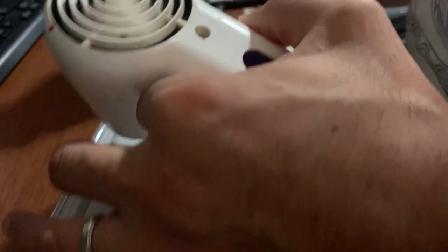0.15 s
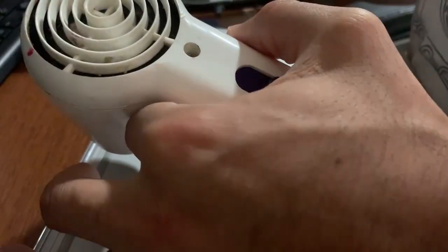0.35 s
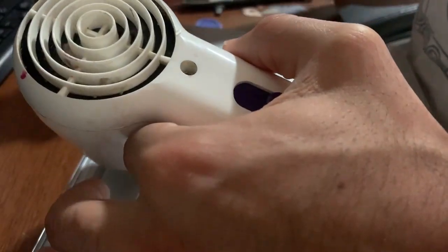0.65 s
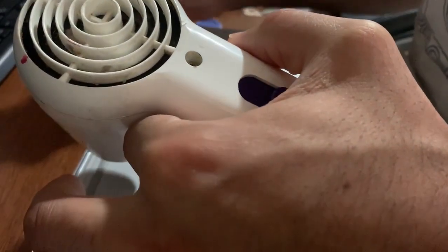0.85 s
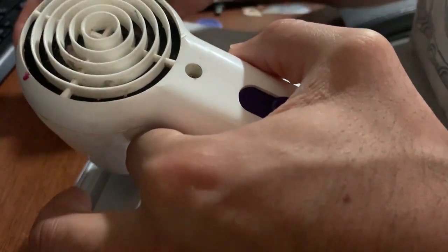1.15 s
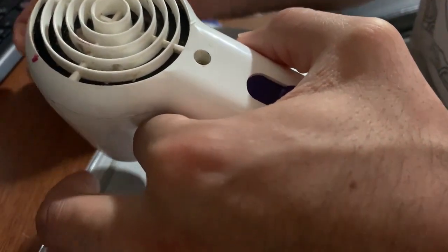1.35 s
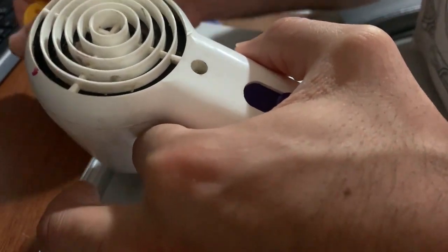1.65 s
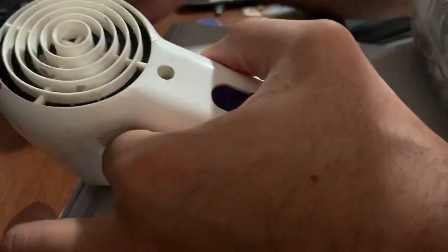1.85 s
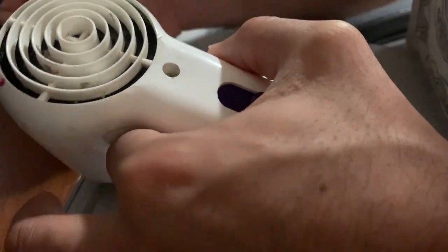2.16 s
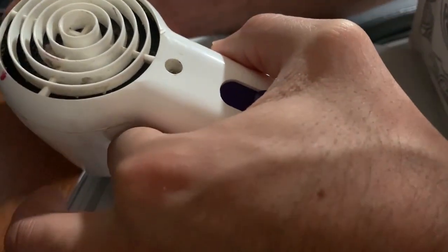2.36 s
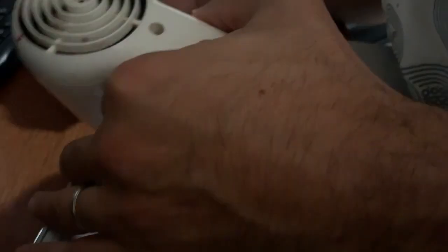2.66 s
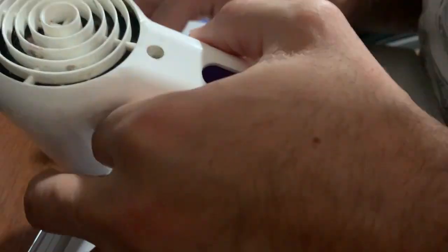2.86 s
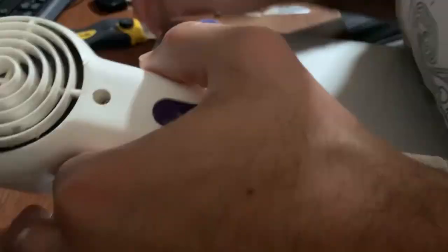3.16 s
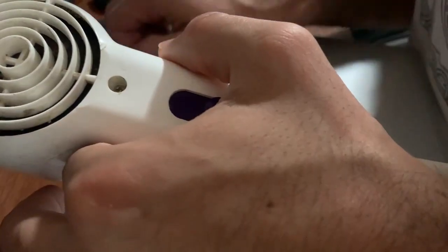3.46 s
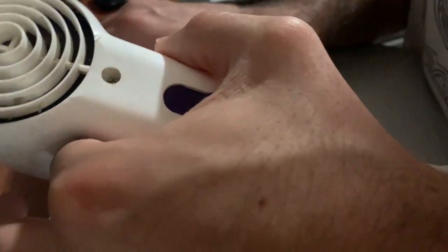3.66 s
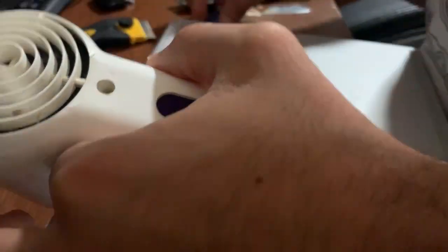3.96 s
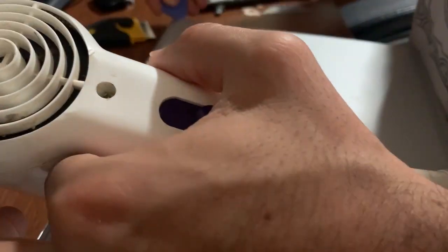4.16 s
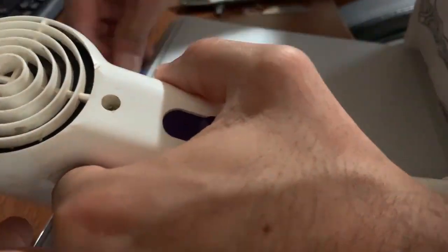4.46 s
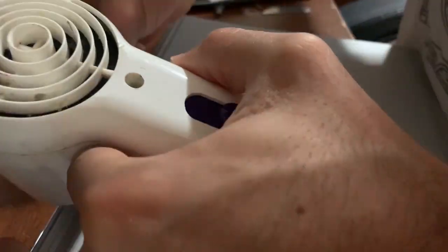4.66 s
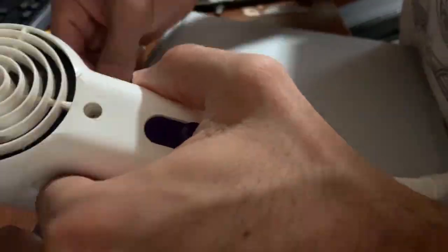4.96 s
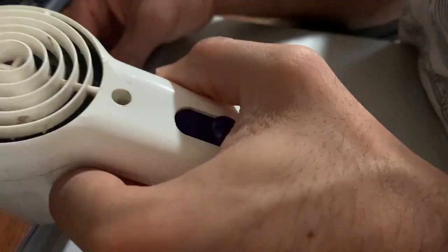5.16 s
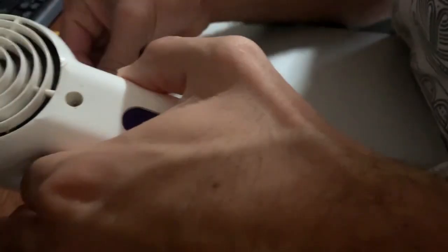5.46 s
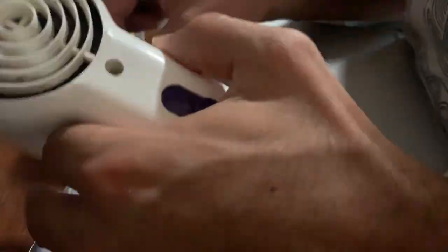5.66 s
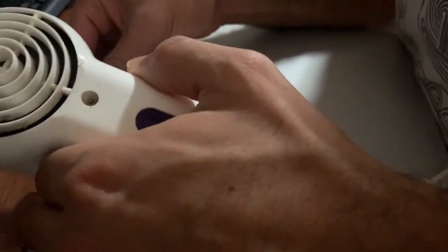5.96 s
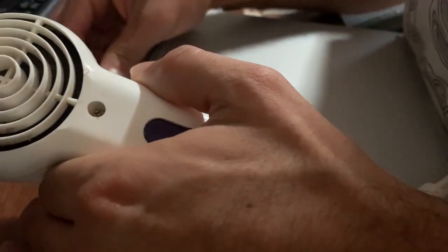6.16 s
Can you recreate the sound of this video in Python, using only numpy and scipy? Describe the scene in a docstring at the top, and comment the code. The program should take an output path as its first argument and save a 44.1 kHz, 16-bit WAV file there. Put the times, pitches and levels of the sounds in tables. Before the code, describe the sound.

Close indoor stereo sound of a hair dryer blowing continuously over a laptop on a desk. The broad hiss carries a steady, shrill whine and a narrow, wavering whistle that weakens in the second half. The whine briefly swells with tiny motor sags and ducks twice just before and after three seconds, around a hard little tick. Soft dull knocks follow, nearly buried in the airflow.

```python
"""A steady rush of air and a high whine, from a small hair dryer close to the microphone at a laptop's edge.
The rush is shaped noise; the fan adds sinusoids at multiples of its blade rate, the whine being the fifth.
The whine swells whenever the motor sags and ducks twice as the dryer is tipped away.
The grille whistles, a narrow noise-fed tone, as the hand moves. Under it a knife ticks on the edge
(filtered impulses), a few soft knocks ring the desk (decaying modes), and faint hums hold steady."""
import sys
import numpy as np
from scipy import signal
from scipy.fft import rfft, irfft
from scipy.io import wavfile
from scipy.ndimage import uniform_filter1d

SR = 44100
rng = np.random.default_rng(int(sys.argv[2]) if len(sys.argv) > 2 else 0)


def bounce(signal):
    """Save signal as a 16-bit WAV file at the path given by the first command-line argument."""
    frames = np.transpose(np.atleast_2d(signal))
    limited = np.clip(frames, -1, 1)
    pcm = np.round(limited * 32767).astype(np.int16)
    wavfile.write(sys.argv[1], SR, pcm)


N = 278712
TIME = np.arange(N) / SR

# cruising speed of the fan, before sags and unsteadiness: (t/s, blade-passing rate f/Hz)
CRUISING_SPEED = [(0, 2184), (1.1, 2195), (2.1, 2182), (3.7, 2190), (4.5, 2183), (5.6, 2190), (6.32, 2176)]
# the motor sags for a moment: (middle t/s, length t/s, drop f/Hz)
MOTOR_SAGS = [(1.985, .12, 15), (2.79, 0.0583, 7.87), (2.98, 0.0798, 16.96), (4.06, 0.1042, 8.13),
              (4.685, .07, 26), (5.06, 0.071, 10.97)]


def blade_rate(unsteady_hz=2.113):
    """Blade passing: the fan's basic frequency follows its speed, here drifting, sagging and unsteady."""
    return played(CRUISING_SPEED)[0] - swells(MOTOR_SAGS) + unsteady_hz * wobble(rate_hz=7.1)


# drifting beam of the whine: (t/s, left level/dB, right level/dB, left lead phase/rad)
WHINE_BEAM = [(0, -26.5, -28.5, 4.2), (.62, -27.5, -36.5, 3.9), (1.0, -26.5, -31.5, 4.26),
              (1.85, -27, -35, 3.4), (2.05, -29, -28.5, 4.27), (2.45, -25.5, -32, 3.7),
              (3.8, -26.5, -29.5, 4.22), (4.1, -28, -30.5, 2.9), (5.7, -26, -34, 4.2),
              (6.32, -26, -32, 3.76)]
# the dryer is tipped, swinging its beam off the microphone: (middle t/s, length t/s, left loss level/dB)
TIPS_AWAY = [(2.78, 0.17, 19), (3.09, 0.12, 26)]
TIP_RIGHT_SHARE = 0.34  # the right port lies nearer the edge of the beam and loses less


def aim(t=TIME):
    """Directivity: left and right level/dB and left lead/rad drift with the aim, and tipping costs level."""
    left_db, right_db, lead = played(WHINE_BEAM, t)
    loss_db = swells(TIPS_AWAY, t)
    return np.array([left_db - loss_db, right_db - TIP_RIGHT_SHARE * loss_db, lead])


# fan tones: (multiple of the blade rate, left level/dB, right level/dB, left lead phase/rad,
# greatest flutter level/dB)
FAN_TONES = [(1, -43, -40.5, 0.85, 1.56), (2, -58, -52.5, 3, 5), (4, -57, -58, -4.5, 13),
             (6, -56, -58, -6, 0)]
WHINE_DB_PER_SAG_HZ = 0.26  # a slower fan brings the whine nearer to a resonance of the duct


def fan(blade_hz, jitter_hz=1.88, whine_flutter_db=0.65, sway_db=0.93):
    """Harmonic radiation: turbulence shakes pitch and level of the blade tones; the hand sways the whine."""
    angle = 2 * np.pi * np.cumsum(blade_hz + jitter_hz * wobble(rate_hz=43)) / SR
    out = np.zeros((2, N))
    for multiple, left_db, right_db, lead, flutter_db in FAN_TONES:
        flutter = flutter_db * np.tanh(wobble(rate_hz=43))
        level = gain_of(np.array([[left_db], [right_db]]) + flutter)
        out += level * np.cos(round(multiple) * angle - np.array([[0], [lead]]))
    whine_angle = 5 * angle
    left_db, right_db, lead = aim()
    sway = sway_db * np.array([wobble(rate_hz=21) for port in range(2)])
    swell = WHINE_DB_PER_SAG_HZ * swells(MOTOR_SAGS)
    flutter = whine_flutter_db * wobble(rate_hz=120)
    level = gain_of(np.array([left_db, right_db]) + swell + sway + flutter)
    out += level * np.cos([whine_angle, whine_angle - lead])
    return np.sqrt(2) * out  # levels are rms


# edge whistle of the grille at the two ports, before its overall lift:
# (t/s, left level/dB, right level/dB, left lead phase/rad)
GRILLE_WHISTLE = [(0, -26.5, -36.7, -2.3), (0.24, -32.1, -34.1, -2.4), (0.5, -29.1, -35.9, -0.5),
                  (0.72, -29.4, -42.9, -3.8), (1.16, -24.9, -41.2, 0.3), (1.4, -26.2, -33.9, -0.5),
                  (1.84, -27.5, -34.8, -0.8), (1.96, -30.4, -41.5, -2.6), (2.24, -29.6, -31.4, -0.8),
                  (2.62, -30.8, -31.2, -0.7), (2.7, -31.4, -30.9, -2.5), (3.16, -31.6, -30.7, -3.6),
                  (3.36, -37.7, -39.3, -2.5), (3.86, -38.2, -34.1, -2.0), (4.2, -42.2, -43.0, -1.2),
                  (4.8, -35.0, -38.7, 1.0), (5.1, -40.9, -39.3, -1.2), (5.18, -27.8, -37.4, 1.3),
                  (5.54, -40.7, -35.5, -1.8), (5.84, -35.5, -37.9, -1.4), (6.0, -46.9, -39.6, -0.3),
                  (6.32, -42.3, -41.5, -3.0)]
# the whistle catches and flares up: (middle t/s, length t/s, gain level/dB)
WHISTLE_FLARES = [(3.87, .07, 3), (5.175, .05, 3.5), (5.37, .12, 3)]


def whistle(blade_hz, pitch_hz=9030, wander_hz=17, likeness=0.91, lift_db=2.0, sway_db=0.9):
    """Edge tone: turbulence feeds a narrow band whose pitch wanders and sags with the air speed."""
    width_hz, skirt_hz = 52, 1000
    steadiness, speed_power = .35, 1.6
    offset = np.fft.fftfreq(N, 1 / SR)
    shape = 1 / (1 + 2j * offset / width_hz) / (1 + (offset / skirt_hz) ** 2)
    noise = rng.standard_normal((2, N)) + 1j * rng.standard_normal((2, N))
    left, other = np.fft.ifft(noise * shape)
    band = np.array([left, likeness * left + np.sqrt(1 - likeness ** 2) * other])
    # the jet limits its own swing
    band /= uniform_filter1d(abs(band) ** 2, size=600) ** (steadiness / 2)
    left_db, right_db, lead = played(GRILLE_WHISTLE)
    hz = pitch_hz * (blade_hz / blade_hz.mean()) ** speed_power + wander_hz * wobble(rate_hz=9.14)
    angle = 2 * np.pi * np.cumsum(hz) / SR
    tone = evened((band * np.exp(1j * np.array([angle, angle - lead]))).real)
    sway = sway_db * np.array([wobble(rate_hz=6.4) for port in range(2)])
    return gain_of(np.array([left_db, right_db]) + lift_db + swells(WHISTLE_FLARES) + sway) * tone


# rush of air before the housing and the hand shape it: (f/Hz, left level/dB per Hz, right level/dB per Hz)
AIR_SPECTRUM = [(30, -117, -116), (130, -114, -114), (210, -106, -106), (300, -94.5, -94),
                (500, -85.5, -85.5), (1300, -81, -81.5), (1650, -78.5, -78.5), (2350, -74.5, -74.5),
                (4200, -74.5, -74.5), (5000, -70.5, -71.5), (5250, -74, -76), (5700, -71.5, -74),
                (6100, -76.5, -78), (7200, -66.5, -72.5), (8100, -72, -73), (9800, -71, -74),
                (10600, -65, -67.5), (11600, -66, -69.5), (12500, -69, -74.5), (13600, -69.5, -74),
                (14500, -68, -71.5), (15600, -68.5, -70)]
# resonances of the housing that the air excites: (f/Hz, width f/Hz, lift level/dB)
HOUSING_MODES = [(324, 15, 3), (538, 11, 5.5), (920, 35, 6), (1886, 109, 8.5), (11900, 150, 3.5),
                 (12200, 220, 3.5)]
# the hand shades the hiss: (t/s, 5 kHz level/dB, 7 kHz left level/dB, 7 kHz right level/dB,
# top octave left level/dB, top octave right level/dB)
HAND_SHADE = [(0, 3, -1.5, .5, 0, -.5), (.55, -3, 2, 1, -.5, 0), (1.1, .3, -0.5, 0, 0, 1.5),
              (2.7, 0.5, 0.5, 3, 0, -1), (3.88, 0, -1.5, 1.8, 1.5, -2.5), (4.02, -4, 4.5, -1, -3.5, -2.5),
              (4.75, -2.5, 0, 2, 0, -1), (6.32, 1.5, -2, 0, 1, -1)]
# level of the low rush: (t/s, level/dB)
LOW_RUSH = [(0, -1.5), (.45, -3.5), (.8, -0.4), (2.55, -.5), (3.08, -2.5), (3.4, -0.3), (6.32, -0.8)]


def air_levels(hz, t, beam, patches, tip_share=0.18, beam_share=0.84, patchy_db=.9, buffet_db=0.5):
    """Spectral shaping: resonance, beam and shading add in dB over port, time and frequency."""
    power = 1
    for f0, width, lift_db in HOUSING_MODES:
        power = power + (gain_of(lift_db) ** 2 - 1) / (1 + (2 * (hz - f0) / width) ** 2) ** 1.23
    levels = np.array(across(AIR_SPECTRUM, hz))[:, None] + 10 * np.log10(power) + beam_share * beam[:2]
    shade = played(HAND_SHADE, t)[:, :, None]
    levels += shade[0] * bell(hz, centre_hz=5330, width_hz=520)
    levels += shade[1:3] * bell(hz, centre_hz=7700, width_hz=2400)
    levels += shade[3:] * bell(hz, centre_hz=14400, width_hz=6800)
    levels += played(LOW_RUSH, t)[0][:, None] * bell(hz, centre_hz=750, width_hz=630)
    # tipping also opens a notch in the hiss at the left port
    levels[0] -= tip_share * swells(TIPS_AWAY, t)[:, None] * bell(hz, centre_hz=6900, width_hz=450)
    smooth_in_time = uniform_filter1d(patches, size=14, axis=0)
    levels += patchy_db * evened(uniform_filter1d(smooth_in_time, size=30, axis=1))
    # stray gusts make the lowest rumble lumpy
    gusts = buffet_db * np.interp(t, TIME, wobble(rate_hz=10))
    levels += gusts[:, None] * bell(hz, centre_hz=40, width_hz=70)
    return levels


# how the rush reaches the two microphone ports: (f/Hz, likeness 0-1, left lead phase/rad)
PORT_COHERENCE = [(100, .4, 0), (280, .96, 0), (550, .9, .1), (1200, .92, .2), (1850, .97, 0),
                  (2400, .85, .2), (4200, .65, .3), (5000, .72, 1.4), (5800, .4, 1.2), (6200, .55, 2.9),
                  (7200, .72, 2.8), (9700, .46, 3.2), (10700, .8, 3.9), (11600, .74, 4.5), (12500, .3, 5),
                  (13600, .22, 5), (14500, .55, 3.4), (15600, .47, 2.1)]


def air():
    """Turbulence noise: random spectra, partly coherent between the ports, are shaped and overlap-added."""
    size, hop = 2048, 512
    hz, t = np.fft.rfftfreq(size, 1 / SR), np.arange(N // hop + 5) * hop / SR
    same, lead = across(PORT_COHERENCE, hz)
    # the hiss near the whine is beamed along with it, in level and in direction
    beam = aim(t)[:, :, None]
    beam = (beam - np.median(beam, axis=1, keepdims=True)) * bell(hz, centre_hz=10700, width_hz=830)
    a, b, c, d, patches = rng.standard_normal((5, len(t), len(hz)))
    left, other = a + 1j * b, c + 1j * d
    right = (same * left + np.sqrt(1 - same ** 2) * other) * np.exp(-1j * (lead + beam[2]))
    spectra = np.array([left, right]) * gain_of(air_levels(hz, t, beam, patches))
    noise = signal.istft(spectra.swapaxes(1, 2), nperseg=size, noverlap=size - hop)[1][:, :N]
    return noise * np.sqrt(3 * SR / size / 2)  # makes the levels dB per Hz


# the blade of a knife ticks on the laptop's edge and bounces: (t/s, peak level/dB)
KNIFE_TICKS = [(2.8586, -14.5), (2.8672, -23)]


def ticks(low_hz=2100, high_hz=5000, rattle_db=-26, rattle_t60=0.086, body_db=-8):
    """Impact excitation: a hard tip snaps on plastic, rattles briefly and stirs a little of the shell."""
    out, t = np.zeros(N), np.arange(SR // 10) / SR
    tip = signal.butter(3, [low_hz, high_hz], "band", fs=SR, output="sos")
    shell = signal.butter(2, [650, 1200], "band", fs=SR, output="sos")
    for s, peak_db in KNIFE_TICKS:
        rattle = rng.standard_normal(len(t)) * gain_of(rattle_db - 60 * t / rattle_t60)
        blow = signal.unit_impulse(len(t)) + rattle
        crack = signal.sosfilt(tip, blow) + gain_of(body_db) * signal.sosfilt(shell, blow)
        add(out, s, gain_of(peak_db) * crack / abs(crack).max())
    return out


# soft knocks on the desk: (t/s, peak level/dB of the first landing, hardness as a cut-off f/Hz)
DESK_KNOCKS = [(3.885, -39, 1070), (5.016, -32.5, 1000), (5.343, -36, 450), (5.493, -31.5, 1220),
               (6.011, -34, 1000), (6.111, -37.5, 900)]
# what the desk rings with: (f/Hz, relative level/dB before the cut-off, 60 dB decay t/s)
DESK_MODES = [(70.4, -40, .1), (386, -11, 0.055), (482, -4, 0.051), (606, 0, 0.051), (694, -4, 0.084),
              (790, 5.5, 0.032), (952, 8.5, 0.047), (1090, -24, .05)]
REBOUND_S, REBOUND_DB = 0.00693, -8.5  # each knock lands again after about this delay


def knocks(lag_s=0.000093):
    """Modal ringing: soft blows ring the desk, off to the left; harder ones reach its higher modes."""
    out, t = np.zeros(N), np.arange(SR // 5) / SR
    for s, peak_db, hard_hz in DESK_KNOCKS:
        ring = np.zeros(len(t))
        for k, (hz, mode_db, t60) in enumerate(DESK_MODES):
            mode = gain_of(mode_db - 60 * t / t60) * np.sin(2 * np.pi * hz * t)
            ring += (-1) ** k * mode / (1 + (hz / hard_hz) ** 4)
        blow = gain_of(peak_db) * ring / abs(ring).max()
        add(out, s, blow)
        add(out, s + REBOUND_S * rng.uniform(0.84, 1.17), gain_of(REBOUND_DB) * blow)
    return np.array([out, np.interp(TIME - lag_s, TIME, out)])


# faint steady hums in the room: (f/Hz, rms level/dB)
ROOM_HUMS = [(265, -83), (401, -76), (900, -64)]


def hums(waver_rad=.25, rate_hz=4):
    """Pure tones: thin sinusoids of wavering phase that do not follow the dryer's speed."""
    out = np.zeros(N)
    for hz, db in ROOM_HUMS:
        out += gain_of(db) * np.sin(2 * np.pi * hz * TIME + waver_rad * wobble(rate_hz))
    return np.sqrt(2) * out


def gain_of(db):
    """Logarithmic level: decibels to amplitude."""
    return 10 ** (np.asarray(db) / 20)


def evened(x):
    """Normalization: scales to rms 1."""
    return x / np.sqrt(np.mean(x ** 2) + 1e-20)


def played(table, t=TIME):
    """Linear interpolation: the columns of a curve at the times t."""
    s, *columns = np.transpose(table)
    return np.array([np.interp(t, s, c) for c in columns])


def across(table, hz):
    """Logarithmic frequency scale: the columns of a spectrum at the frequencies hz."""
    f, *columns = np.transpose(table)
    return [np.interp(np.log(hz + 1), np.log(f), c) for c in columns]


def swells(table, t=TIME):
    """Gaussian pulses: rises and falls, each with a middle, a length at half height and a height."""
    return sum(height * .5 ** ((2 * (t - s) / length) ** 2) for s, length, height in table)


def wobble(rate_hz):
    """Low-passed noise: smooth chance of rms 1, up to about rate_hz."""
    hz = np.fft.rfftfreq(N, 1 / SR)
    return evened(irfft(rfft(rng.standard_normal(N)) / (1 + (hz / rate_hz) ** 4), N))


def bell(hz, centre_hz, width_hz):
    """Gaussian weighting: a smooth band of height 1."""
    return np.exp(-.5 * ((hz - centre_hz) / width_hz) ** 2)


def add(mix, s, sound):
    """Superposition: mixes a sound in at s seconds."""
    part = mix[round(s * SR):][:len(sound)]
    part += sound[:len(part)]


def scene():
    """Superposition: the dryer with the small handling sounds and room hums under it."""
    blade_hz = blade_rate()
    return fan(blade_hz) + whistle(blade_hz) + air() + ticks() + knocks() + hums()


def record(dry, edge_hz=15770):
    """Band limiting: the recorder's steep linear-phase low-pass."""
    low_pass = signal.firwin(1023, edge_hz, window=("kaiser", 9), fs=SR)
    return signal.oaconvolve(dry, low_pass[None], "same")


dry = scene()
out = record(dry)
bounce(out)
```